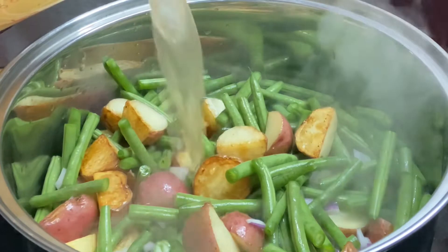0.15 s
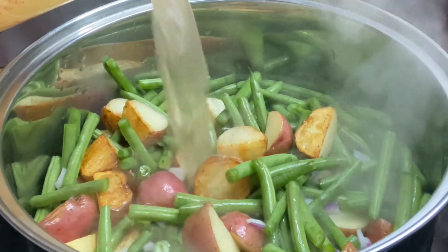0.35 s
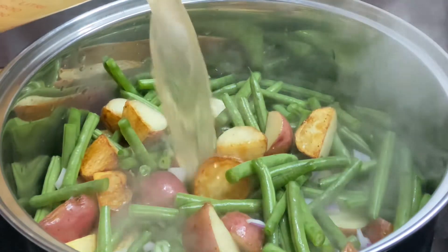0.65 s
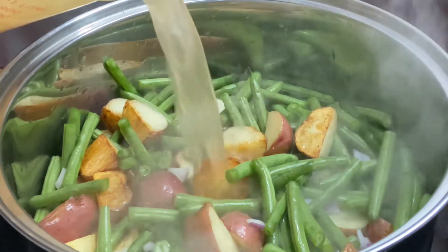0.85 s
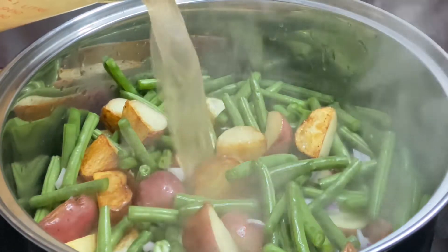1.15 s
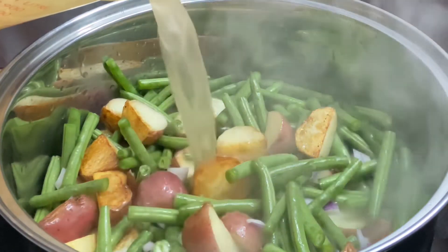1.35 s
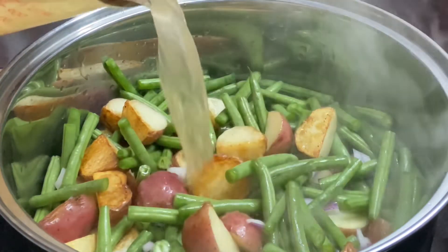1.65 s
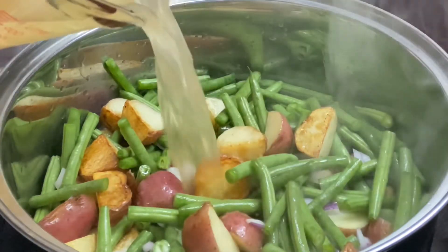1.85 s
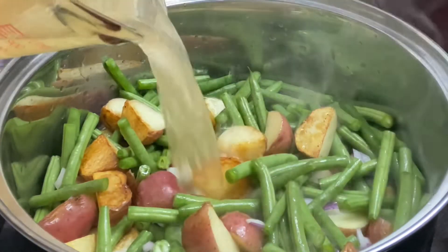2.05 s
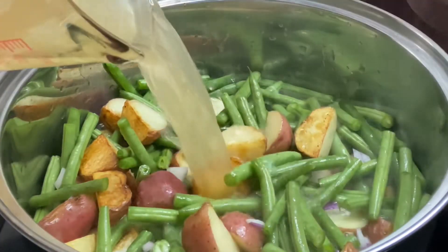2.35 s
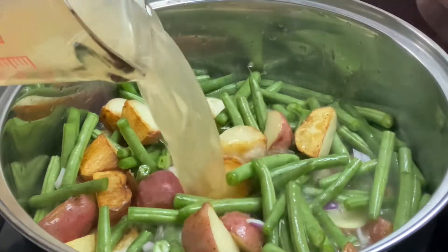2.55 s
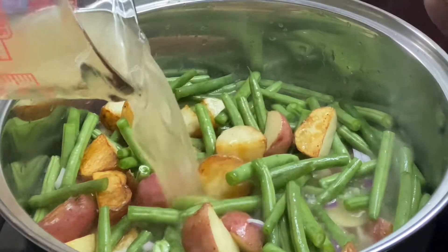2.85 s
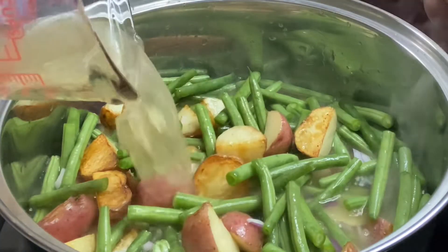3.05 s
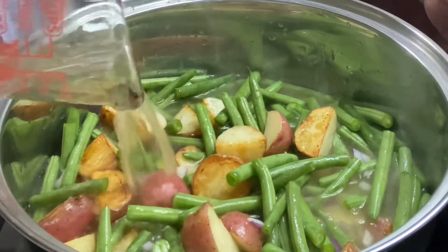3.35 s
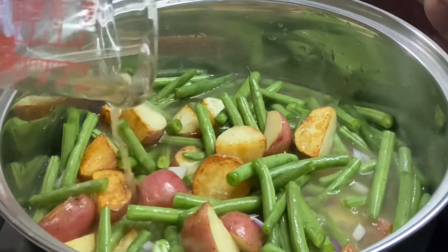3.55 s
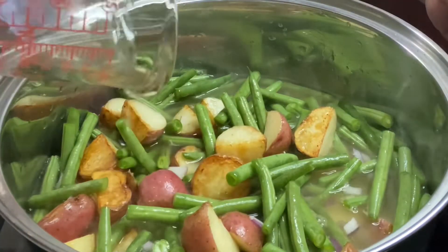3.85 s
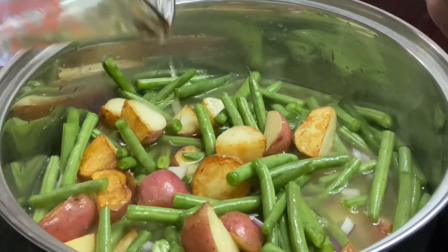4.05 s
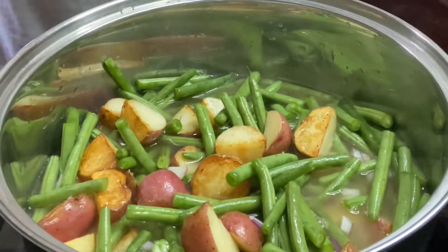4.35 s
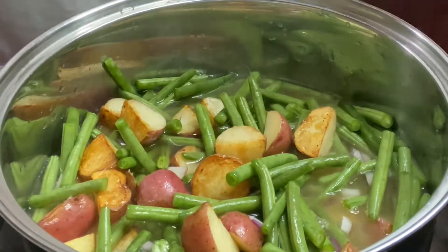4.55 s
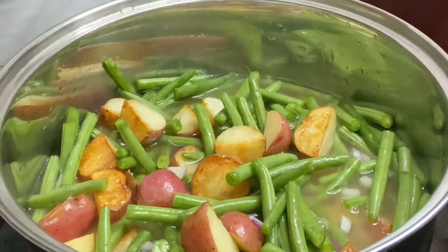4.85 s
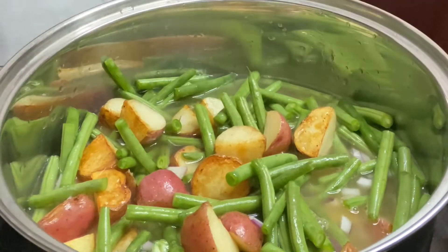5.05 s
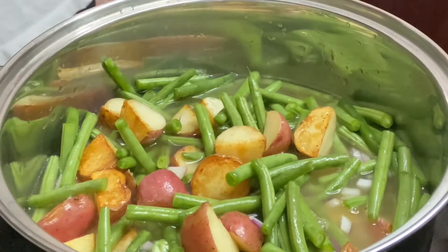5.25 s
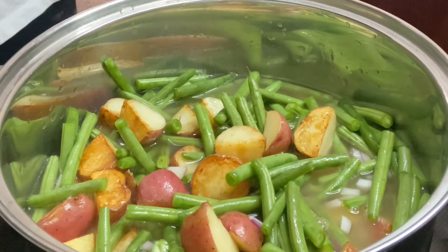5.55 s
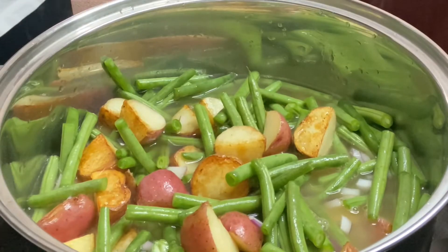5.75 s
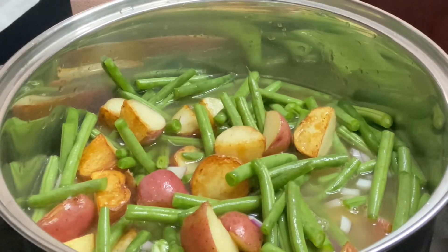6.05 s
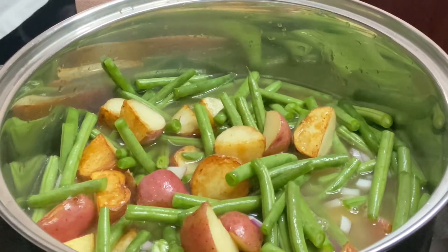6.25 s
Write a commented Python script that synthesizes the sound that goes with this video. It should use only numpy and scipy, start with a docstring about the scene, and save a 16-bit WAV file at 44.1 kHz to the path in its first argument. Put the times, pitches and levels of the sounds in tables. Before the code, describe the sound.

Broth pours into a scorching steel pot with a fierce steam hiss, fading to a bubbly trickle and faint sizzle, then light clinks and hard knocks.

```python
"""Broth into a hot pot

Broth pours from a glass jug into a hot steel pot of vegetables: noise crackle, shaped by the boil, hisses as
steam and spurts; chirped sines ring as bubbles while the stream thins to a trickle over a faint sizzle.
Scraped noise and thin modes make light clinks; noise thuds and counter modes set the jug down, rocking,
in a small kitchen of steady noise."""
import sys
import numpy as np
from scipy import signal
from scipy.fft import rfft, irfft, next_fast_len
from scipy.io import wavfile

SR = 44100
rng = np.random.default_rng(int(sys.argv[2]) if len(sys.argv) > 2 else 0)


def pcm_store(signal):
    """Save signal as 16-bit PCM."""
    levels = np.round(np.clip(np.atleast_2d(signal), -1, 1) * 32767)
    wavfile.write(sys.argv[1], SR, levels.astype(np.int16).T)


N = 281799
T = np.arange(N) / SR
AGE = np.arange(SR) / SR  # s since a blow


def undb(db):
    """Decibels to gain."""
    return 10 ** (np.asarray(db) / 20)


def unit(x):
    """Scale to rms 1."""
    return x / np.sqrt(np.mean(x ** 2))


def add(out, start_s, x):
    """Mix x into out from start_s on."""
    i = max(int(start_s * SR), 0)
    out[i:i + len(x)] += x[:N - i]


def since(start_s):
    """Seconds gone by since start_s, zero before it."""
    return np.maximum(T - start_s, 0)


def fade(t60_s):
    """Exponential decay that loses 60 dB in t60_s."""
    return np.exp(-np.log(1000) * AGE / t60_s)


def swell(level_db, from_s, until_s, rise_db_per_s, fall_db_per_s):
    """Gain that rises, holds and falls, linear in dB."""
    rise_db = rise_db_per_s * np.maximum(from_s - T, 0)
    return undb(level_db - rise_db - fall_db_per_s * since(until_s))


def walk(rate_hz):
    """Random drift: straight lines between Gaussian points, rate_hz of them a second."""
    return np.interp(T * rate_hz, np.arange(1024), rng.standard_normal(1024))


def lowpass(x, cutoff_hz):
    """Second-order treble cut."""
    return signal.lfilter(*signal.butter(2, np.clip(cutoff_hz, 100, SR / 3), fs=SR), x)


def colour(x, points, peaks=(), size=4096):
    """Minimum-phase filter of unit power from a smooth spectrum and resonances."""
    f_hz = np.arange(size // 2 + 1) * SR / size
    point_hz, point_db = np.transpose(points)
    shape_db = np.interp(np.log(f_hz + 1), np.log(point_hz), point_db)
    for centre_hz, width_hz, lift_db in peaks:
        shape_db = shape_db + lift_db / (1 + (2 * (f_hz - centre_hz) / width_hz) ** 2)
    # fold the cepstrum to make the filter causal
    cepstrum = irfft(np.log(unit(undb(shape_db))))
    cepstrum[1:size // 2] *= 2
    cepstrum[size // 2 + 1:] = 0
    impulse = irfft(np.exp(rfft(cepstrum)))
    return signal.fftconvolve(x, impulse)[:len(x)]


def crackle(rate_hz, spread_db, hiss_db):
    """Random clicks of unequal size over a smooth hiss, rms 1."""
    sizes = undb(spread_db * np.minimum(rng.exponential(size=N), 5))
    pops = (rng.random(N) < rate_hz / SR) * sizes * rng.choice([-1, 1], N)
    return unit(unit(pops) + undb(hiss_db) * rng.standard_normal(N))


def flicker(x, rate_hz, depth_db, count=15):
    """Bubbles of each size come in clouds: every band swells and ebbs alone, the treble most."""
    size = next_fast_len(N)
    spectrum, out = rfft(x, size), np.zeros(N)
    place = np.sqrt(np.linspace(0, 1, len(spectrum))) * count
    for k in range(count + 1):
        band = irfft(spectrum * np.maximum(1 - np.abs(place - k), 0), size)[:N]
        band_depth_db = depth_db * min(2 * k / count, 1)
        out += band * unit(undb(band_depth_db * walk(rate_hz)))
    return out


def echo(x, t60_s, wet_db):
    """Add a diffuse tail of reflections."""
    tail = rng.standard_normal(SR) * fade(t60_s) * (1 - fade(0.05))
    return x + undb(wet_db) * signal.fftconvolve(x, tail / np.linalg.norm(tail))[:N]


def ring(modes):
    """Decaying sine modes after one blow."""
    return sum(undb(db) * np.sin(2 * np.pi * hz * AGE) * fade(t60_s) for hz, db, t60_s in modes)


def bubble(pitch_hz, cycles, rise):
    """A bubble rings for some cycles and rises in pitch as it nears the surface."""
    length_s = cycles / pitch_hz
    life = np.arange(int(length_s * SR)) / (length_s * SR)
    phase = 2 * np.pi * cycles * life * (1 + rise * life / 2)
    return np.sin(phase) * np.exp(-np.log(100) * life)


def bubbles(low_hz, high_hz, cycles, spread_db, count):
    """A swarm of small bubbles at random times, a few much louder than the rest, rms 1."""
    out = np.zeros(N)
    for when, pitch, size, life in rng.random((count, 4)):
        pitch_hz = low_hz * (high_hz / low_hz) ** pitch
        gain = undb(-spread_db * np.log(size + 0.09))
        add(out, when * N / SR, gain * bubble(pitch_hz, cycles * (.5 + life), rise=0.13))
    return unit(out)


PUFF_RELEASE_TAU_S = 0.0096


def puffs(table):
    """Gain over time of puffs of steam that each swell, hold and die away."""
    out = np.zeros(N)
    for start_s, length_s, level_db in table:
        attack = 1 - fade(min(.5 * length_s, .025))
        release = np.exp(-np.maximum(AGE - 0.77 * length_s, 0) / PUFF_RELEASE_TAU_S)
        add(out, start_s, undb(level_db) * attack * release)
    return out


BOIL_DB, COOLING_DB_PER_S = -14, 3.5
FLOOD_S, COVERED_S, FLOOD_POWER = 1, 1.75, 1.09  # broth creeps over the bare steel
COVERED_BOIL_DB, COVERED_COOLING_DB_PER_S = -44.5, 5


def boiling():
    """Boil strength: heat of the steel times its bare share, plus a weak boil that fades once covered."""
    bare = np.clip((COVERED_S - T) / (COVERED_S - FLOOD_S), 0, 1)
    covered = undb(COVERED_BOIL_DB - COVERED_COOLING_DB_PER_S * since(COVERED_S))
    return np.hypot(undb(BOIL_DB - COOLING_DB_PER_S * T) * bare ** FLOOD_POWER, covered)


# spurts of steam: start_s, length_s, level_db
SPURTS = [(0, 0.31, -15), (.27, 0.15, -17), (.397, 0.0042, -14.5), (1.109, 0.017, -16),
          (1.213, 0.0052, -17), (1.25, 0.02, -19), (1.345, 0.0085, -19), (1.405, 0.045, -22),
          (1.515, 0.045, -24.5), (1.578, 0.011, -22.5), (1.612, 0.045, -24.5), (1.702, 0.018, -28),
          (1.757, 0.013, -31), (2.026, 0.083, -36), (2.214, 0.054, -33.5), (2.384, 0.017, -35),
          (2.492, 0.041, -32.5), (2.633, .034, -26), (2.761, 0.0045, -28), (2.815, 0.0065, -26),
          (2.843, 0.045, -28.5), (2.966, 0.028, -33.5)]
# steam spectrum: freq_hz, density_db_per_hz (relative)
STEAM_COLOUR = [(60, -37), (230, -38), (380, -21.5), (520, -11.5), (830, -10.5), (1000, -2.5), (2100, 2.5),
                (3000, -1.5), (3700, -2.5), (5200, -3.5), (7100, 0), (8800, -6), (10000, -19.5),
                (13000, -17.5), (15700, -7)]
# splash and muffled-steam spectrum: freq_hz, density_db_per_hz (relative)
SPLASH_COLOUR = [(100, -40), (250, -5), (340, -8), (470, 8.5), (660, 3), (880, -3), (1100, 1.5), (1900, -3),
                 (2300, -0.5), (4300, -5.5), (7200, -15), (9000, -14), (11000, -28.5), (15700, -30)]
# air resonances and dips of the open pot: centre_hz, width_hz, lift_db
POT_AIR = [(575, 24, 7), (632, 31, -7.5), (696, 68, 11.5), (797, 60, -5), (988, 57, 5.5), (1500, 52, 5),
           (2050, 74, 1), (2680, 260, 2), (3260, 190, -5), (3750, 385, 1.5)]
# air pockets under the food: centre_hz, width_hz, lift_db
POCKETS = [(1070, 167, 20.1), (1590, 76, 16.6), (1846, 130, 17)]
# the deepening pool muffles the spurts: final share, half-way time, spread
MUFFLED_SHARE, MUFFLED_S, MUFFLED_SPREAD_S = 0.87, 1.83, 0.22
MUFFLED_HZ = 8000  # the food takes the top off a spurt


def steam():
    """Boiling hiss; as the bottom floods it comes in spurts, more and more from under the food."""
    spurts = puffs(SPURTS)
    muffled = np.clip(MUFFLED_SHARE / (1 + np.exp((MUFFLED_S - T) / MUFFLED_SPREAD_S)), 0, 1)
    boil = np.hypot(boiling() * undb(walk(70.3)), np.sqrt(1 - muffled) * spurts)
    hiss = flicker(crackle(rate_hz=3500, spread_db=1.5, hiss_db=3.0), rate_hz=110, depth_db=2.5)
    hiss = colour(hiss, [(2200, 0), (4500, -4.5), (8000, -5.5), (10000, -2.5)]) * boil
    # ringing vapour bubbles, which stand out as the boiling eases
    swarm = bubbles(3000, 9200, cycles=42, spread_db=3.2, count=6000)
    swarm = undb(-8.5) * swarm * boil ** .85
    gush = crackle(rate_hz=2300, spread_db=4, hiss_db=-5.5) * np.sqrt(muffled) * spurts
    vapour = colour(hiss + swarm, STEAM_COLOUR, POT_AIR)
    vapour = vapour + colour(lowpass(gush, MUFFLED_HZ), SPLASH_COLOUR, POCKETS)
    # bright droplet ticks, strongest in the fiercest boiling
    spit = crackle(rate_hz=1700, spread_db=0.5, hiss_db=5)
    spit = colour(spit, [(100, -19), (2000, -3), (9000, 15), (15700, 1.5)])
    return echo(vapour, t60_s=0.056, wet_db=-12.5) + undb(-2) * spit * boil ** 2


# single bright bubbles: start_s, level_db, pitch_hz
PLINKS = [(2.1303, -25, 5340), (2.221, -21, 5240), (2.4426, -22.5, 5380), (2.9328, -18.5, 5870),
          (3.0402, -19.5, 6840), (3.0888, -23.5, 2160), (3.1304, -26, 4240), (3.1854, -22.5, 5670),
          (3.201, -20, 5330), (3.264, -27, 5070), (3.3737, -25, 6560), (3.4923, -22.5, 6200),
          (3.5914, -29, 2540), (3.683, -26.5, 4650)]
# fizz, until the stream stops: level_db, hold_from_s, hold_until_s, rise_db_per_s, fall_db_per_s
FIZZ = (-44, 3, 3.5, 8, 55)
SPLASH_DB, CUSHION_DB_PER_S = -36, 7  # the pool cushions the stream
EMPTYING_S, EMPTYING_DB_PER_S = 3.16, 25  # the jug runs empty


def pour():
    """The stream patters on the food and drags under small bubbles that ring."""
    stream = undb(SPLASH_DB - CUSHION_DB_PER_S * since(COVERED_S) - EMPTYING_DB_PER_S * since(EMPTYING_S))
    patter = flicker(crackle(rate_hz=1500, spread_db=3.5, hiss_db=4.5), rate_hz=46, depth_db=1.5)
    patter = patter * undb(0.48 * walk(33.5))
    resonances = [(275, 50, 5.8), (570, 45, 5), (674, 38, 10.8), (1030, 120, 8.8), (1600, 160, 4.3)]
    splash = colour(patter, SPLASH_COLOUR, resonances) * stream
    small = bubbles(3930, 9100, cycles=44, spread_db=6.5, count=4500)
    large = bubbles(1760, 2880, cycles=32, spread_db=7, count=700)
    # bursting films add a fine top
    films = colour(crackle(rate_hz=1000, spread_db=3.5, hiss_db=1),
                   [(3000, -2), (7500, 0), (8500, -2), (10000, -11), (12500, -15), (15700, -7)])
    fizz = (small + undb(-10) * large + undb(-4.0) * films) * swell(*FIZZ)
    for start_s, level_db, pitch_hz in PLINKS:
        add(fizz, start_s, undb(level_db) * bubble(pitch_hz, cycles=38, rise=0.065))
        birth = colour(rng.standard_normal(SR) * fade(0.0048), SPLASH_COLOUR)  # splash of its birth
        add(fizz, start_s, undb(level_db - 25) * birth)
    return splash + echo(fizz, t60_s=0.024, wet_db=-7.5)


# simmering along the pot wall: level_db, hold_from_s, hold_until_s, rise_db_per_s, fall_db_per_s
SIZZLE = (-42, 3.0, 4, 2, 7.5)
# simmer spectrum: freq_hz, density_db_per_hz (relative)
SIZZLE_COLOUR = [(59, -83), (100, -22.5), (163, -9.5), (201, -14.5), (314, -6), (396, -9), (511, 0),
                 (645, -4), (985, -0.5), (1070, -1.5), (1140, -4.5), (3090, -10.5), (6770, -20),
                 (9710, -41), (15800, -27)]


def sizzle():
    """Fine simmering that rises, holds, then sinks as the broth cools the steel."""
    grains = flicker(crackle(rate_hz=2000, spread_db=1.5, hiss_db=2.0), rate_hz=45, depth_db=4.7)
    resonances = [(162, 50, 5.5), (533, 47, 2.5), (713, 36, 5.5), (5270, 1100, -1), (6700, 970, 9.5)]
    return colour(grains, SIZZLE_COLOUR, resonances) * swell(*SIZZLE)


# kitchen air spectrum: freq_hz, density_db_per_hz (relative)
ROOM_COLOUR = [(25, -5), (60, -9.5), (130, -5.5), (250, -8.5), (500, -6.5), (1100, -11), (2000, -15.5),
               (3200, -18.5), (4400, -16), (5500, -21), (7200, -18), (8000, -20.5), (12000, -21.5),
               (15700, -23)]
ROOM_DB = -53


def kitchen():
    """Steady air noise with a low drone from a narrow resonance."""
    air = colour(rng.standard_normal(N), ROOM_COLOUR, [(157, 15, 5.6), (6870, 800, 4)])
    return undb(ROOM_DB) * air


# gusts of steam on the microphone: start_s, length_s, level_db
GUSTS = [(.09, 0.12, -59), (.27, 0.16, -60), (.397, 0.0082, -41)]


def buffet():
    """Rising steam brushes the microphone: low rumbling noise that ends in one short puff."""
    rumble = colour(rng.standard_normal(N), [(25, 0), (90, -1), (200, -3), (600, -30), (3000, -70)])
    return rumble * puffs(GUSTS)


# stray drops on the food: start_s, level_db (before colouring)
SLAPS = [(3.085, -28.5), (3.333, -41), (3.388, -27)]
SLAP_T60_S = 0.043


def slaps():
    """Drops from the breaking stream land with short, bright noise splats."""
    out = np.zeros(N)
    for start_s, level_db in SLAPS:
        add(out, start_s, undb(level_db) * rng.standard_normal(SR) * fade(SLAP_T60_S))
    return colour(out, [(300, -26), (1200, -9), (2100, -7), (3000, -4), (8500, 5), (11000, -11), (15700, -7)])


# light clinks: start_s, scrape_db, ring_db, ring_pitch_hz (levels relative)
CLINKS = [(4.637, -46, -37, 2590), (4.677, -46, -36.5, 2560), (4.744, -38.5, -33.5, 2600),
          (4.796, -33, -46, 2840), (4.841, -35, -48, 2550), (4.926, -42, -33.5, 2520),
          (5.042, -38, -35.5, 2826), (5.141, -45, -42, 2580)]
# modes beside the main ring: freq_hz, level_db, t60_s
CLINK_MODES = [(1086, -3.5, .05), (1400, -10, .06), (3500, -10, .05), (5800, -15, .04)]
CLINK_T60_S = 0.081


def clinks():
    """Brief scraping contacts of noise, each leaving a thin ring of modes."""
    scrapes, rings = np.zeros(N), np.zeros(N)
    for start_s, scrape_db, ring_db, pitch_hz in CLINKS:
        scrape = 2 * rng.standard_normal(SR) * fade(0.038) * (1 - fade(.03))
        add(scrapes, start_s - .001, undb(scrape_db) * scrape)
        modes = [(pitch_hz, -3, CLINK_T60_S)] + CLINK_MODES
        add(rings, start_s + 0.00302, undb(ring_db) * ring(modes))
    scrapes = colour(scrapes, [(200, -21), (600, 7), (1100, 1), (2000, -4), (2800, 2), (5000, -0.5),
                               (8800, -3), (10500, -24), (15000, -30)])
    return echo(scrapes + rings, t60_s=0.29, wet_db=-7.5)


# jug meets counter: start_s, thud_db, boom_db, hardness_cutoff_hz (levels relative)
KNOCKS = [(5.602, -0.5, -12.5, 9000), (5.693, -15.5, -15.5, 1570), (5.828, -25, -28, 1500),
          (5.901, -17.5, -18, 870), (5.924, -13.5, -42, 1000), (5.932, -14.5, -14, 1090),
          (6.076, -28, -18, 1000), (6.092, -31, -13.5, 890), (6.103, -11, -6.5, 2520),
          (6.125, -14, -5.5, 1300), (6.135, -13.5, -8.5, 1700), (6.148, -17, -15.5, 1400),
          (6.203, -30, -21, 1000), (6.286, -21.5, -29, 2600)]
# thud spectrum: freq_hz, density_db_per_hz (relative)
KNOCK_COLOUR = [(30, -51), (70, -31.5), (150, -21), (230, -11.5), (330, -8.5), (600, 1), (1150, -3.5),
                (1600, -8), (2050, -13.5), (2500, -19), (3200, -27), (4300, -33), (5500, -39), (15000, -48)]
# counter modes: freq_hz, level_db, t60_s
COUNTER = [(600, 4, 0.082), (556, -6.5, 0.046), (460, -31, 0.06), (683, -9, 0.086), (881, -11.5, 0.14),
           (1101, -14, 0.14), (1460, -38, 0.16), (1603, -18.5, 0.063), (2034, -28, 0.04)]
# glass modes: freq_hz, level_db, t60_s
GLASS = [(6250, -9, 0.1), (7100, -13, 0.18), (7250, -5, 0.18), (9700, -7, 0.064)]
GLASS_DB = -32  # relative to thud_db


def jug():
    """The jug lands hard, then rocks on its base: noise thuds, counter boom, faint ring of glass."""
    thuds, booms, rings = np.zeros((3, N))
    counter, glass = ring(COUNTER) * (1 - fade(0.0081)), ring(GLASS)
    for start_s, thud_db, boom_db, hard_hz in KNOCKS:
        rattle = rng.standard_normal(SR) * fade(0.088) * (1 - fade(0.0027))
        # a soft blow leaves a duller room tail
        room = lowpass(rng.standard_normal(SR), min(1.4 * hard_hz, 2700))
        room = undb(-17.5) * room * fade(0.93) * (1 - fade(0.096))
        add(thuds, start_s, undb(thud_db) * lowpass(rattle + room, hard_hz))
        add(booms, start_s, undb(boom_db) * counter)
        add(rings, start_s, undb(thud_db + GLASS_DB) * glass)
    # the first landing also shakes the cabinet below and cracks the counter's stiff modes
    landing = ring([(89, -32, .2), (135, -34, 0.25), (243, -36, .25),
                    (1570, -14, 0.18), (1837, -6.5, 0.063), (2000, -12, 0.084)])
    add(rings, KNOCKS[0][0], landing * (1 - fade(0.02)))
    thuds = colour(thuds, KNOCK_COLOUR, [(682, 23, 2.6), (809, 34, 4.0), (1143, 43, 10.6), (4200, 400, 5)])
    return thuds + echo(booms, t60_s=0.59, wet_db=-11) + rings * undb(2.0 * walk(90))


def scene():
    """Pot, jug and kitchen at one microphone."""
    pot = steam() + pour() + sizzle() + buffet() + slaps()
    return (pot + kitchen() + clinks() + jug())[None]


TOP_HZ = 15900


def record(dry):
    """The microphone sheds rumble, the hardest peaks are rounded off, the top is cut."""
    thin = signal.lfilter(*signal.butter(1, 40, "high", fs=SR), dry)
    rounded = thin / (1 + thin ** 6) ** (1 / 6)
    return signal.sosfilt(signal.ellip(10, .2, 70, TOP_HZ, fs=SR, output="sos"), rounded)


dry = scene()
out = record(dry)
pcm_store(out)
```